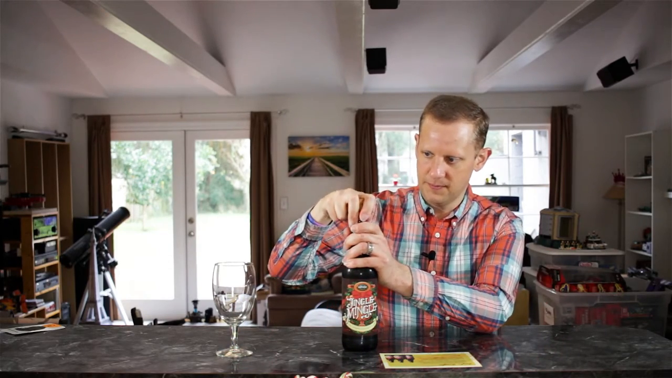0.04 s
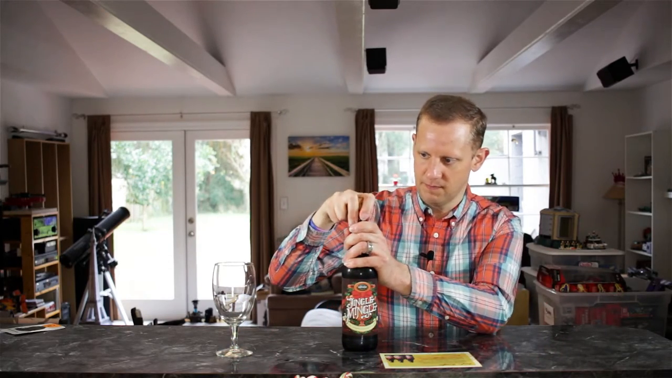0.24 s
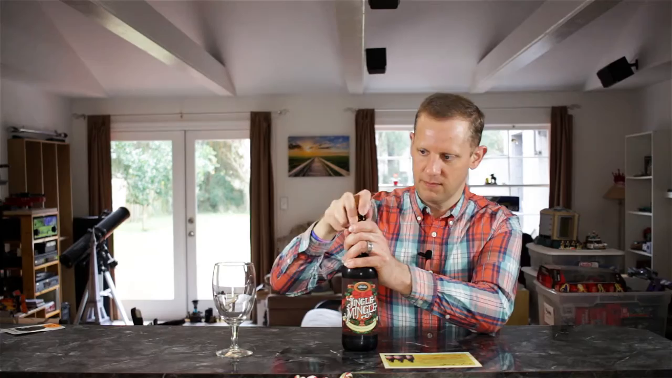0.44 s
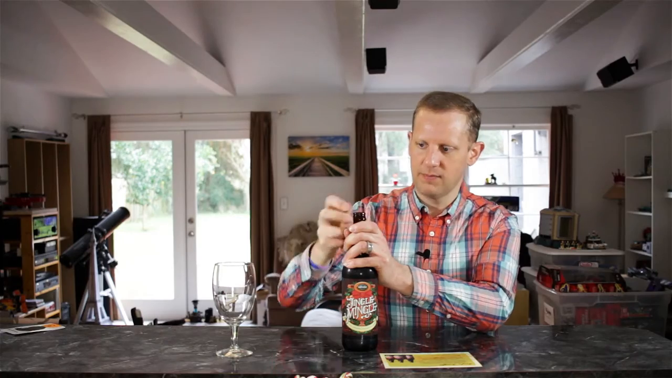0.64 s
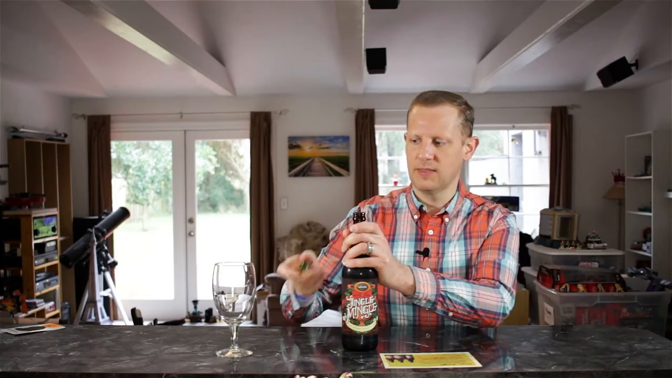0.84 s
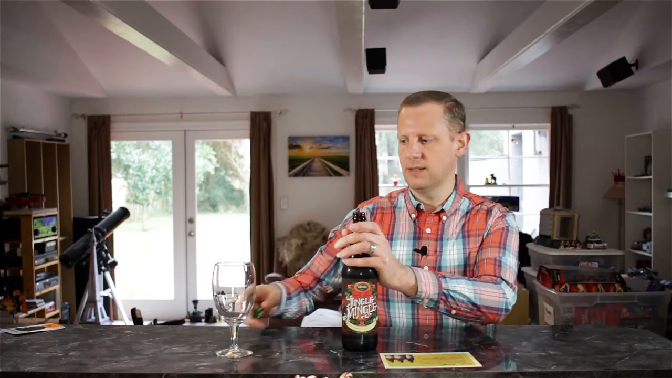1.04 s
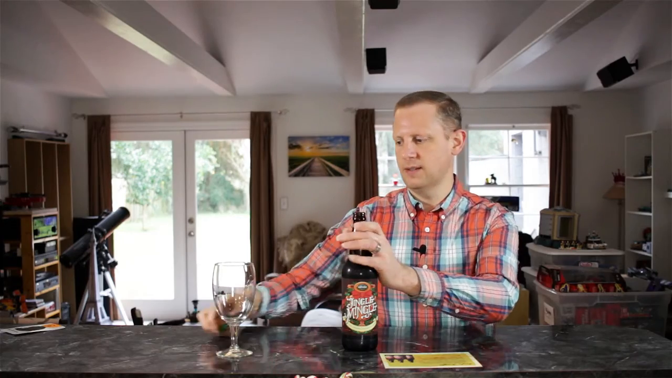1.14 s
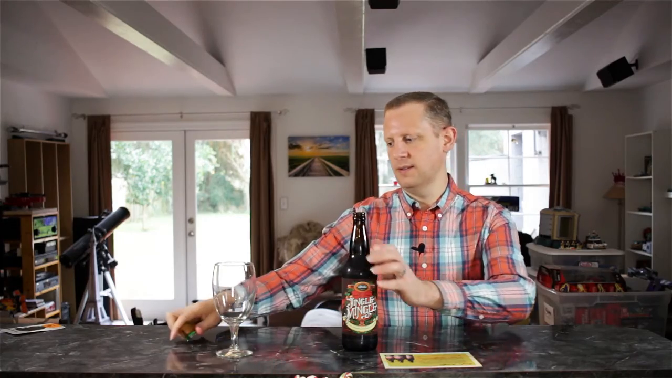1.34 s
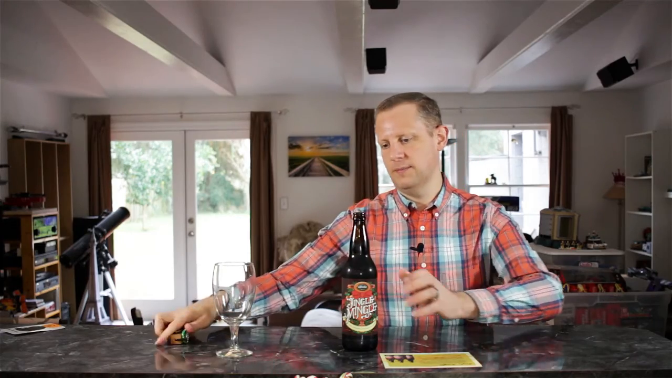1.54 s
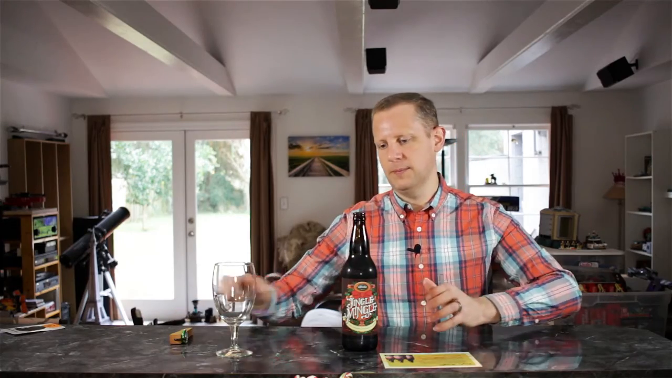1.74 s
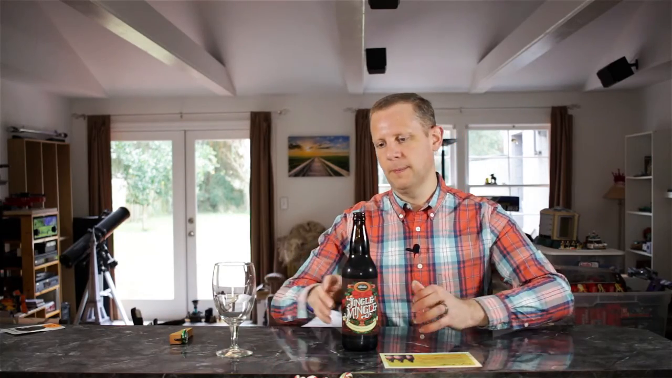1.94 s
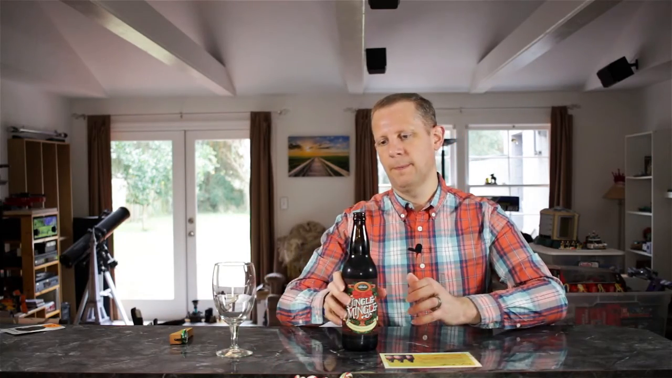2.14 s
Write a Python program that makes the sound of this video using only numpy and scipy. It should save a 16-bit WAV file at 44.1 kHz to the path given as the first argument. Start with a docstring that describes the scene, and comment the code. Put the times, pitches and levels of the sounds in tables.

```python
"""A quiet room tone with a faint fizz comes first, then gas hisses out as a glass bottle is opened.
The cap pops, a short whistle glides upward and the cap clicks free. Later the opener taps a stone counter
and lands with a short, ringing clatter; small hand ticks come before and after.
Air sounds and bumps are shaped noise, fizz and rattle are random tiny bursts, the whistle is a gliding sine;
struck things are sums of fading sines with noise. Echoes and a room answer are added."""
import sys
import numpy as np
from scipy import signal
from scipy.fft import rfft, irfft, next_fast_len
from scipy.io import wavfile

SR = 44100
rng = np.random.default_rng(int(sys.argv[2]) if len(sys.argv) > 2 else 0)


def unload_wav(signal):
    """Save mono or channel-first audio to the path in sys.argv[1] as 16-bit WAV at rate SR, clipped to [-1, 1]."""
    wavfile.write(
        sys.argv[1],
        SR,
        np.round(np.clip(np.atleast_2d(signal).T, -1, 1) * 32767).astype(np.int16),
    )


N = 97020  # length in samples: 2.2 s
HIT_SAMPLES = SR // 4  # each struck sound lasts at most a quarter second

# In the tables fade_s is the time to fall by 60 dB; levels come before the room and microphone.

# Background
# tone colour of the room tone: pitch_hz, level_db
ROOM_TONE_COLOUR = [(25, -35), (60, -9.5), (100, -3), (140, 5), (200, 1), (320, -3), (600, -9), (1500, -13),
                    (5000, -20.5), (15000, -24)]
# loudness of the room tone: time_s, level_db
ROOM_TONE_LEVEL = [(0, -67.5), (.2, -65), (2.05, -62.5), (2.2, -67.5)]
# tone colour of the bubbles: pitch_hz, level_db
FIZZ_COLOUR = [(300, -4), (1200, 1.5), (3000, 2), (6000, 1.5), (9000, -5.5), (15000, -12.5)]
# loudness of the fizz: time_s, level_db
FIZZ_LEVEL = [(0, -73.5), (.18, -63.5), (.5, -67.5), (.72, -66), (1.1, -65), (1.45, -63.5), (1.85, -69),
              (2.2, -79.5)]
FIZZ_PER_S, FIZZ_SPREAD_DB = 2800, 4  # average bursts per second, spread of their levels

# The room
# how fast each pitch dies away in the room: pitch_hz, fade_s
ROOM_FADE = [(150, .5), (500, 0.26), (1500, 0.2758), (4000, 0.25), (8000, 0.33), (15000, 0.15)]
# tone colour of the room's answer: pitch_hz, level_db
ROOM_COLOUR = [(100, 0), (450, 2.5), (800, 7.5), (1500, -3), (3000, 4.5), (6000, -3.5), (12000, 1)]
ROOM_DELAY_S, ROOM_BUILD_S, COUNTER_WET_DB = 0.0014, 0.015, -11
# what the bottle and hands send into the room: pitch_hz, level_db
NEAR_TO_ROOM_COLOUR = [(700, -17), (1800, -13.5), (4500, -17.5), (7200, -23), (10500, -12.5), (14000, -17)]
# near surfaces echo the clatter: delay_s, level_db
ECHOES = [(.0017, -12), (.0039, -13), (0.0184, -20.5)]

# The hands
# the grip shifts on the bottle: centre_s, level_db, spread_s
BUMPS = [(0.297, -49.5, 0.0062), (0.335, -45.5, 0.0048), (0.381, -58.5, 0.038), (0.478, -48.5, 0.0012),
         (0.611, -54.5, 0.032), (0.728, -55, 0.015), (1.126, -57, 0.0059), (1.874, -58.5, 0.0028)]
# tone colour of those bumps: pitch_hz, level_db
BUMP_COLOUR = [(50, -29), (130, 5), (330, -2), (520, -3.5), (900, -15.5), (3000, -22.5)]
# small dry ticks of handling, before a band filter: start_s, level_db, centre_hz, fade_s
TICKS = [(0.4765, -38, 3640, 0.0015), (0.7261, -37, 2500, 0.0011), (.741, -34, 2360, 0.0012),
         (0.9396, -25.5, 2100, 0.0013), (1.1344, -33.5, 1930, 0.0017), (1.2395, -38, 3240, 0.0023),
         (1.8723, -40, 3500, 0.00053), (1.979, -50, 3620, 0.013), (2.076, -37.5, 3420, 0.00071)]
TICK_TOP_RATIO = 4  # upper edge of a tick's band, as a multiple of its centre
TICK_GRIT_DB, TICK_GRIT_FADE_S = -25.5, 0.027

# The opener on the counter
# ringing of a first light tap: pitch_hz, level_db, fade_s
TAP_MODES = [(338, -20, 0.089), (510, -18, .03), (1720, -5.5, .009), (2750, -1.5, 0.0032),
             (3953, 0.5, 0.002), (4970, -5, 0.0068), (5770, -10, .008)]
TAP_S, TAP_DB, TAP_GRIT_DB, TAP_GRIT_FADE_S = 1.4387, -28, -20, .012
# the opener's knocks on the counter, with one later echo of the hardest (at 1.6214 s):
# start_s, knock_level_db, first_ring_level_db, second_ring_level_db
KNOCKS = [(1.5597, -18.5, -23, -24.5), (1.59, -22.5, -35.5, -32.5), (1.6045, -13, -17, -28.5),
          (1.6074, -3.5, -17.5, -24.5), (1.6095, -18, -26, -32), (1.6214, -22, -32, -44),
          (1.6396, -14, -19.5, -39)]
# ringing of the knock: pitch_hz, level_db, fade_s
KNOCK_MODES = [(444, -30.5, 0.042), (515.6, -24.5, 0.072), (710, -30, .1), (877, -29, .1), (1192, -16, .03),
               (1430, -25, 0.067), (1571, -16.5, .045), (1718, -14, 0.018), (1930, -1.5, 0.0042),
               (2167, -21.5, 0.031), (2487, -21.5, .02), (2740, -29.5, 0.021), (3300, -28, 0.02),
               (4090, -33, 0.02)]
# first metal ring, bright: pitch_hz, level_db, fade_s
FIRST_METAL_MODES = [(5800, -1.5, 0.011), (5850, -40.5, .27), (5974, -7.5, .010), (9150, -26, 0.014),
                     (9670, -23, 0.011)]
# second metal ring, one tone near 5 kHz and a faint one at 11 kHz: pitch_hz, level_db, fade_s
SECOND_METAL_MODES = [(5040, -1, 0.013), (11000, -20, .008)]
# low boom of the counter under each knock: pitch_hz, level_db, fade_s
BOOM_MODES = [(78, -54, .45), (127, -39.5, 0.22), (182, -40.5, 0.54), (347, -37.5, 0.04)]
# how stone and metal send out a knock: pitch_hz, level_db
KNOCK_COLOUR = [(60, -23), (200, -12), (330, -3), (480, 0), (640, -5.5), (900, -2), (1200, 3.5),
                (2500, 2.5), (4200, 1.5), (7500, -7), (15000, -2.5)]
KNOCK_ATTACK_S, RING_ATTACK_S, BOOM_ATTACK_S = .00007, 0.00052, .02
KNOCK_GRIT_DB, KNOCK_GRIT_FADE_S = -26, .012
# tone colour of the chatter after the hardest knock: pitch_hz, level_db
RATTLE_COLOUR = [(800, -21), (2000, -5), (3000, 0), (4300, -1), (5200, -11.5), (6800, -8), (9000, -21.5),
                 (15000, -28.5)]
RATTLE_DB, RATTLE_PER_S, RATTLE_FADE_S = -40.5, 700, 0.26

# The cap and the bottle's neck
# gas blowing over the mouth: time_s, pitch_hz, level_db
WHISTLE = [(.555, 645, -91), (.57, 661, -68), (.584, 676, -53), (.606, 694, -60), (.622, 693, -69),
           (.636, 700, -55), (.652, 729, -71), (.70, 760, -84)]
# ringing air in the neck: pitch_hz, level_db, fade_s
NECK_MODES = [(652, -4.5, 0.11), (1015, 3.5, 0.0082), (2507, 0.5, 0.022), (4430, 0, 0.018)]
POP_S, POP_DB = .5149, -41.5
# ringing of the metal cap: pitch_hz, level_db, fade_s
CAP_MODES = [(1880, -11, 0.016), (3020, 1, 0.012), (2970, -21, 0.22), (4570, -2.5, 0.009),
             (5600, -9, 0.0074), (8740, -1, 0.0075), (11580, -20, 0.0059)]
# tone colour of the scratchy part of the click: pitch_hz, level_db
CAP_GRIT_COLOUR = [(300, -9), (1500, 5.5), (3000, 11), (5500, 11), (9000, 6.5), (15000, -7)]
CAP_S, CAP_DB = .6295, -36

# The escaping gas
# loudness of the jet before its sputter: time_s, level_db
GAS_LEVEL = [(.2, -84.5), (.218, -63), (.234, -39.5), (.247, -28), (.261, -22.5), (.272, -19), (.283, -20),
             (.291, -31.5), (.298, -39.5), (.33, -60.5), (.44, -92)]
# tone colour of the thin jet: pitch_hz, level_db
JET_COLOUR = [(2000, -50), (4500, -19.5), (5500, -11), (6200, 0.5), (8000, -3), (9300, -6.5), (11500, -6),
              (13500, 0.5), (15200, -0.5), (15700, -4)]
# tone colour of the wider rush: pitch_hz, level_db
RUSH_COLOUR = [(60, -26.5), (200, -2), (700, -2.5), (1800, 1.5), (2800, 0.5), (5000, 3), (9000, -7.5)]
RUSH_DB = -21  # rush compared with the loudest point of the gas
RUSH_GROWS = 0.9  # dB change of the rush for each dB of the jet
JET_OPENS_S, JET_OPENING_S, TREBLE_LAG_DB = 0.266, .03, -1
SPUTTER_DB, SPUTTER_HZ = 1.46, 250  # typical size of the level flicker, and its fastest rate

# The microphone
TOP_HZ, TOP_WIDTH_HZ = 15950, 600


def amp(db):
    """Turn decibels into a multiplier."""
    return 10 ** (np.asarray(db) / 20)


def unit(x):
    """Scale to an average (rms) strength of 1."""
    return x / np.sqrt(np.mean(x ** 2) + 1e-20)


def along(points, hz):
    """Read a value between table points, with pitch on a log scale."""
    point_hz, value = np.transpose(points)
    return np.interp(np.log(hz + 1), np.log(point_hz + 1), value)


def clock(size=N):
    """Give the time in seconds at each sample."""
    return np.arange(size) / SR


def curves(rows):
    """Join the points of each column after the time by straight lines, one value per sample."""
    time_s, *columns = np.transpose(rows)
    return [np.interp(clock(), time_s, column) for column in columns]


def coloured(x, colour):
    """Make some pitches of a sound stronger and others weaker."""
    size = next_fast_len(len(x) + 8192)  # spare room so the end does not wrap to the start
    gain = amp(along(colour, np.fft.rfftfreq(size, 1 / SR)))
    return irfft(rfft(x, size) * gain, size)[:len(x)]


def noise(colour):
    """Make steady coloured noise of rms strength 1."""
    return unit(coloured(rng.standard_normal(N), colour))


def add(track, start_s, sound):
    """Mix a sound into the track at its start time."""
    part = track[round(start_s * SR):][:len(sound)]
    part += sound[:len(part)]


def ring(modes):
    """A struck object rings as one or more sines that fade at their own speeds."""
    t = clock(HIT_SAMPLES)
    return sum(amp(db - 60 * t / fade_s) * np.sin(2 * np.pi * hz * t) for hz, db, fade_s in modes)


def grit(fade_s):
    """A rough impact gives a quickly dying burst of noise."""
    return rng.standard_normal(HIT_SAMPLES) * amp(-60 * clock(HIT_SAMPLES) / fade_s)


def rise(attack_s):
    """A soft start climbs quickly at first, then levels out at 1."""
    return 1 - np.exp(-clock(HIT_SAMPLES) / attack_s)


def room_tone():
    """The quiet room is steady coloured noise whose level drifts."""
    level_db, = curves(ROOM_TONE_LEVEL)
    return amp(level_db) * noise(ROOM_TONE_COLOUR)


def fizz():
    """Many tiny bubbles burst at random moments with random strengths."""
    level_db, = curves(FIZZ_LEVEL)
    happens = rng.random(N) < FIZZ_PER_S / SR
    strength = rng.standard_normal(N) * amp(FIZZ_SPREAD_DB * rng.standard_normal(N))
    return amp(level_db) * unit(coloured(happens * strength, FIZZ_COLOUR))


def room(x):
    """Blurred reflections build up, then each pitch dies away at its own speed."""
    hz, t, grid = signal.stft(rng.standard_normal(SR // 2), SR, nperseg=256)
    fade = amp(-60 * t / along(ROOM_FADE, hz)[:, None])
    tail = signal.istft(grid * fade, SR, nperseg=256)[1]
    since_delay = np.maximum(clock(len(tail)) - ROOM_DELAY_S, 0)
    build = 1 - np.exp(-since_delay / ROOM_BUILD_S)
    answer = build * coloured(tail, ROOM_COLOUR) / np.linalg.norm(build * tail)
    return signal.fftconvolve(x, answer)[:N]


def echoes(x):
    """Near surfaces return a few separate, weaker copies of the sound."""
    out = x.copy()
    for delay_s, level_db in ECHOES:
        add(out, delay_s, amp(level_db) * x)
    return out


def hand_bumps():
    """The shifting grip makes soft swells of mostly low noise."""
    t = clock()
    swells = sum(amp(db) * np.exp(-((t - centre_s) / spread_s) ** 2 / 2)
                 for centre_s, db, spread_s in BUMPS)
    return swells * noise(BUMP_COLOUR)


def hand_ticks():
    """Each dry tick is a short ring with some grit, kept within one broad band of pitches."""
    out = np.zeros(N)
    for start_s, level_db, hz, fade_s in TICKS:
        snap = ring([(hz, 0, fade_s)]) + amp(TICK_GRIT_DB) * grit(TICK_GRIT_FADE_S)
        band = [hz / 3, min(TICK_TOP_RATIO * hz, TOP_HZ)]
        b, a = signal.butter(2, band, "bandpass", fs=SR)
        add(out, start_s, amp(level_db) * signal.lfilter(b, a, snap))
    return out


def rattle():
    """Tiny random contacts die away after the opener's hardest knock."""
    hardest = max(KNOCKS, key=lambda row: row[1])
    t = clock() - hardest[0]
    hits = (rng.random(N) < RATTLE_PER_S / SR) * rng.standard_normal(N)
    fade = (t > 0) * amp(RATTLE_DB - 60 * np.abs(t) / RATTLE_FADE_S)
    return fade * unit(coloured(hits, RATTLE_COLOUR))


def opener():
    """After a light tap, each knock or its echo sounds the stone, the ringing metal and a low boom."""
    knocks, rings = np.zeros(N), np.zeros(N)
    knock_rise, ring_rise, boom_rise = rise(KNOCK_ATTACK_S), rise(RING_ATTACK_S), rise(BOOM_ATTACK_S)
    tap = ring(TAP_MODES) + amp(TAP_GRIT_DB) * grit(TAP_GRIT_FADE_S)
    add(knocks, TAP_S, amp(TAP_DB) * tap)
    for start_s, knock_db, first_db, second_db in KNOCKS:
        knock = ring(KNOCK_MODES) + amp(KNOCK_GRIT_DB) * grit(KNOCK_GRIT_FADE_S)
        metal = amp(first_db) * ring(FIRST_METAL_MODES) + amp(second_db) * ring(SECOND_METAL_MODES)
        boom = amp(knock_db) * boom_rise * ring(BOOM_MODES)
        add(knocks, start_s, amp(knock_db) * knock_rise * knock)
        add(rings, start_s, ring_rise * metal + boom)
    return coloured(knocks, KNOCK_COLOUR) + rings


def whistle():
    """Gas blowing over the mouth makes a gliding, slightly fluttering tone."""
    hz, level_db = curves(WHISTLE)
    flutter = 1 + 0.2 * noise([(50, -5), (200, -32.0)])
    blowing = (clock() > WHISTLE[0][0]) & (clock() < WHISTLE[-1][0])
    tone = np.sqrt(2) * np.sin(2 * np.pi * np.cumsum(hz) / SR)  # rms 1
    return blowing * amp(level_db) * flutter * tone


def cap():
    """The seal pops and rings the air in the neck; later the metal cap clicks off the lip."""
    out = np.zeros(N)
    pop = ring(NECK_MODES) + amp(-9.0) * grit(fade_s=0.012)
    click = ring(CAP_MODES) + coloured(grit(fade_s=0.0096), CAP_GRIT_COLOUR)
    add(out, POP_S, amp(POP_DB) * pop)
    add(out, CAP_S, amp(CAP_DB) * click)
    return out


def gas():
    """A thin sputtering jet brightens as the crack opens, with a wider rush that follows its level."""
    level_db, = curves(GAS_LEVEL)
    full_db = level_db.max()
    low_pass = signal.butter(2, SPUTTER_HZ, fs=SR, output="sos")
    sputter = unit(signal.sosfilt(low_pass, rng.standard_normal(N)))
    level_db = level_db + SPUTTER_DB * sputter
    jet = noise(JET_COLOUR)
    treble = coloured(jet, [(8000, -31), (10000, 0)])
    closed = np.clip((JET_OPENS_S - clock()) / JET_OPENING_S, 0, 1)  # 1 is closed, 0 is open
    jet = jet + treble * (amp(TREBLE_LAG_DB * closed) - 1)
    rush_db = full_db + RUSH_DB + RUSH_GROWS * (level_db - full_db)
    return amp(level_db) * jet + amp(rush_db) * noise(RUSH_COLOUR)


def scene():
    """The bottle and hands sound direct, the opener has echoes, and both excite the room."""
    counter = opener() + rattle()
    bottle = hand_bumps() + hand_ticks() + whistle() + cap() + gas()
    wet = room(coloured(bottle, NEAR_TO_ROOM_COLOUR)) + room(amp(COUNTER_WET_DB) * counter)
    return (room_tone() + fizz() + wet + echoes(counter) + bottle)[None]


def record(dry, low_cut_hz=105):
    """The microphone thins the bass; the treble ends steeply at the top limit."""
    high_pass = signal.butter(2, low_cut_hz, "highpass", fs=SR, output="sos")
    x = signal.sosfilt(high_pass, dry)
    size = next_fast_len(N + SR // 2)
    edge = np.clip((TOP_HZ - np.fft.rfftfreq(size, 1 / SR)) / TOP_WIDTH_HZ, 0, 1)
    return irfft(rfft(x, size) * np.sin(np.pi / 2 * edge) ** 2, size)[:, :N]


dry = scene()
out = record(dry)
unload_wav(out)
```